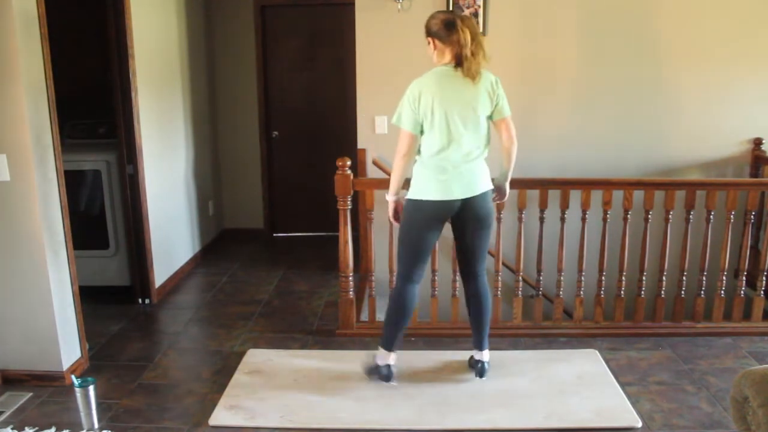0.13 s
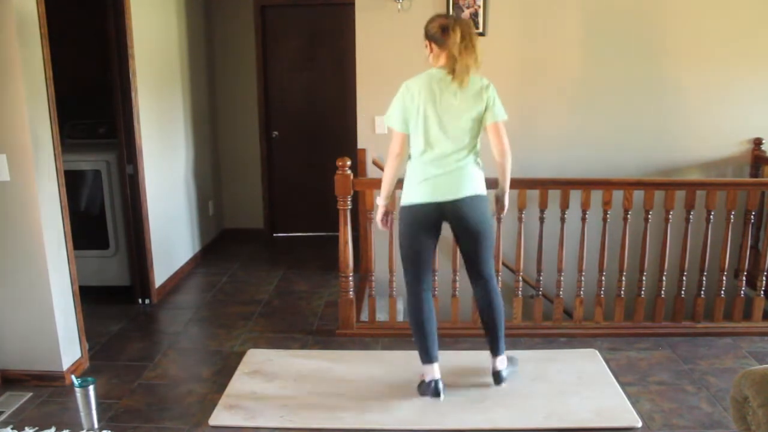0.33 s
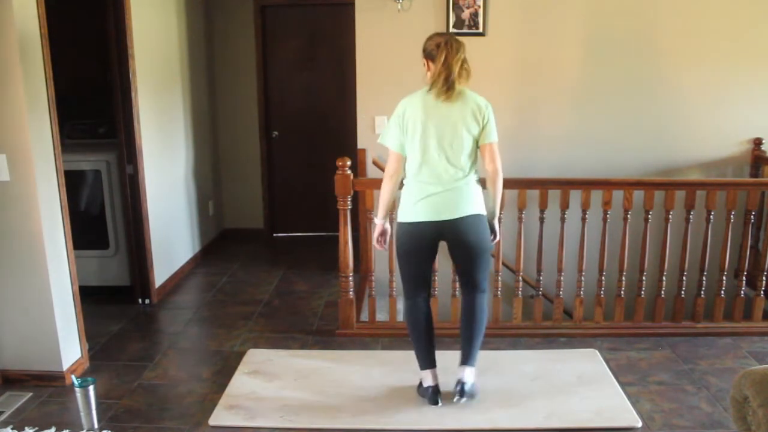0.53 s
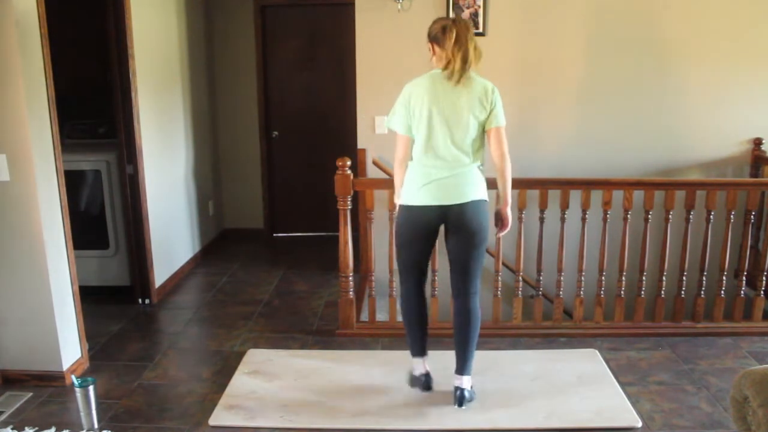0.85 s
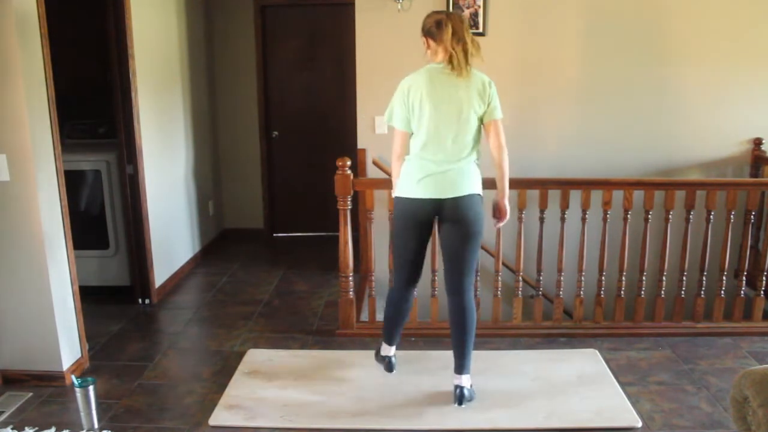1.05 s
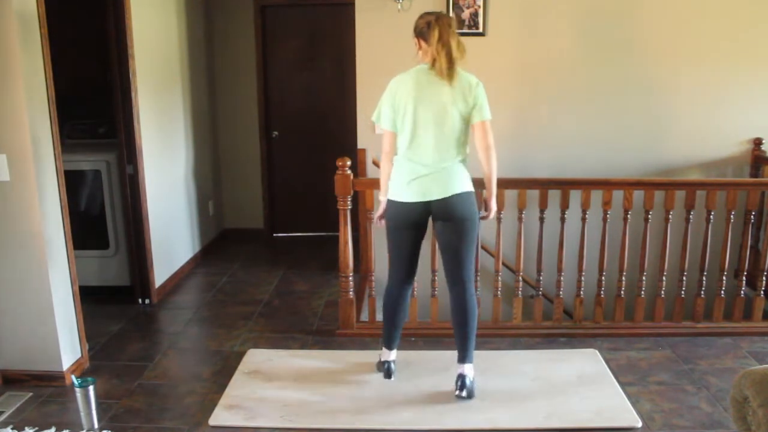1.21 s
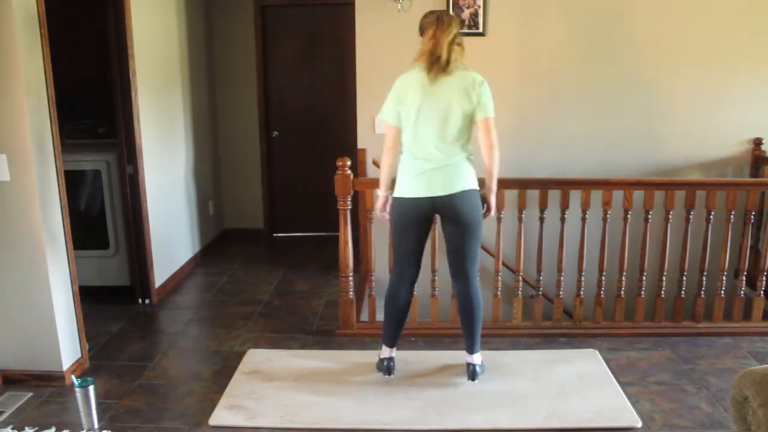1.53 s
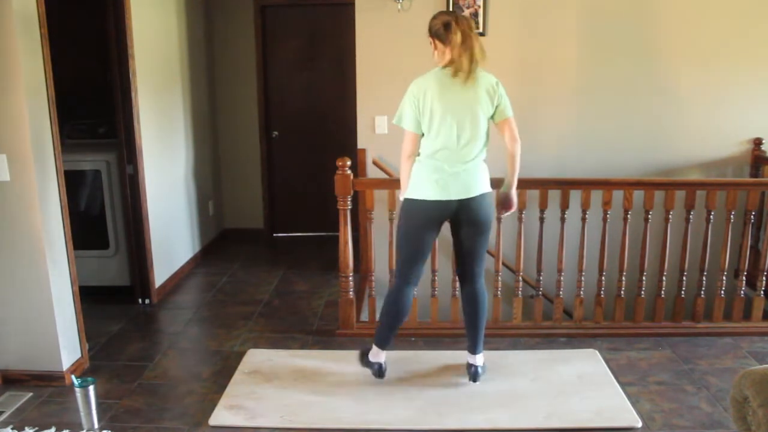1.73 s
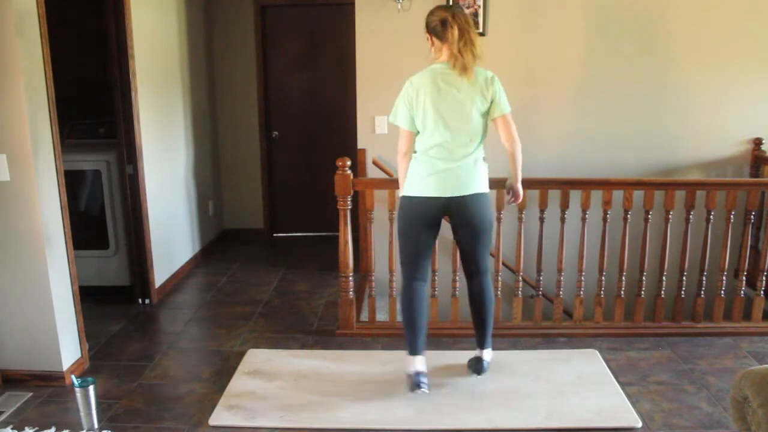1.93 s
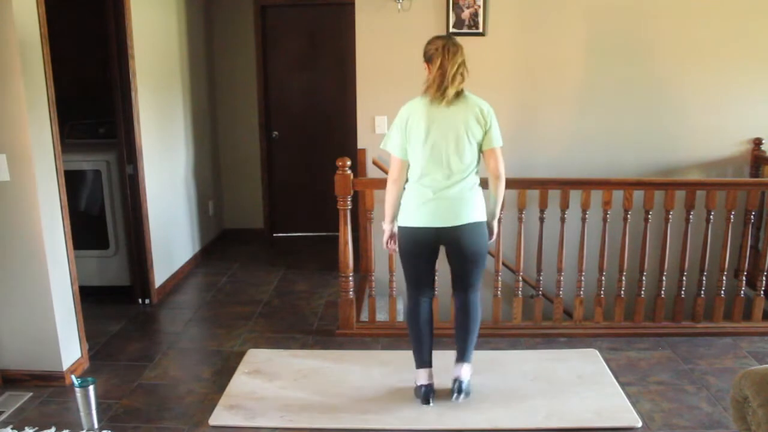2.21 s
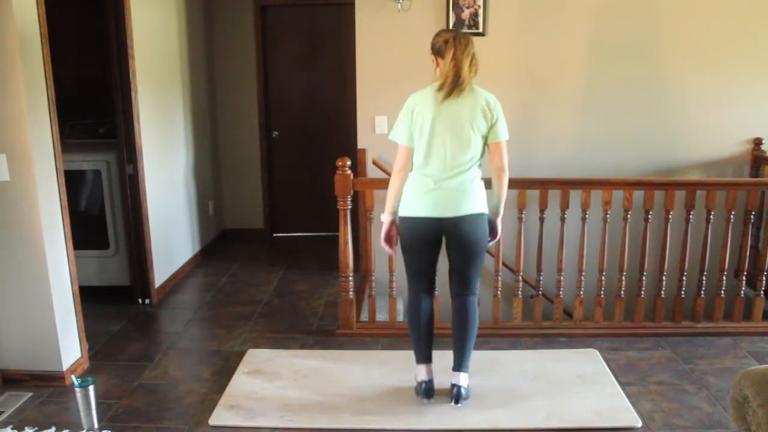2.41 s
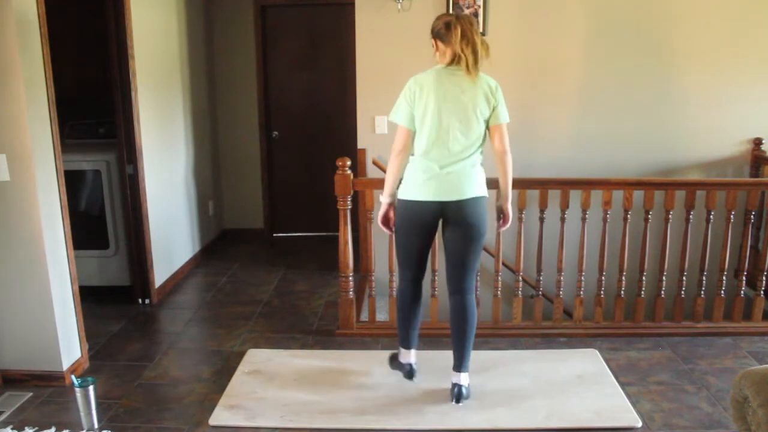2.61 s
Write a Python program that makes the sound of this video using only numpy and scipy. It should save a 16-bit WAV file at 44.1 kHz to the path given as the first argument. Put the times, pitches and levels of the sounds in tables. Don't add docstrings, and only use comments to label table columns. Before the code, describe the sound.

Metal-tipped tap shoes crack on a wooden board: a quick group of four, two separate taps, then a loud stamp and three quick taps, with bright room echo, faint hiss and a slightly overloaded camera microphone.

```python
import sys
import numpy as np
from scipy import signal
from scipy.io import wavfile
from scipy.ndimage import minimum_filter1d

SR = 44100
rng = np.random.default_rng(int(sys.argv[2]) if len(sys.argv) > 2 else 0)


def file_out(sig):
    cols = np.atleast_2d(sig).T
    lim = np.clip(cols, -1, 1)
    pcm = np.round(lim * 32767).astype(np.int16)
    wavfile.write(sys.argv[1], SR, pcm)


def gain_from_db(level_db):
    decades = np.asarray(level_db, float) / 20
    return 10 ** decades


N = 121275
LEAD = 22050

# start in seconds, level in dB, step kind (row of STEP_KINDS and SKIMMING).
TAPS = [(-.2, -8, 7), (.2155, -2, 0), (0.3442, -10, 1), (.448, -10.5, 2), (.6066, -7, 3), (1.1668, -3.5, 4),
        (1.52, -10, 5), (1.8743, 1.5, 6), (2.0217, -9, 1), (2.1260, -10.5, 2), (2.2779, -5.5, 3)]
# frequency in Hz, width in Hz.
RESONANCES = [(330, 300), (580, 560), (1000, 420), (1400, 390), (1800, 730), (2400, 1330), (2900, 1050),
              (3500, 930), (4300, 2700), (5500, 1500), (6800, 3700), (8300, 3200), (12000, 5900)]
# pitch factor, list of lifts in dB, one per resonance.
STEP_KINDS = [
    (1.0, [-1, 6.5, -0.5, 3.5, 7, -1, 9.5, 6.5, -1, 2.5, 6, 6, 4.5]),
    (1.0, [4.5, 6, -4.5, 0, 13.5, -9, -0.5, -1.5, 8.5, 4, -3.5, 17.5, 2]),
    (1.0, [1, -2.5, 5, 4.5, 15.5, -13.5, 5.5, 5.5, 4, -3, 1.5, 1.5, -4]),
    (1.0, [-1.5, -4.5, 3, 2, 11, -11, 10, 2, 5.5, -3.5, 2.5, -0.5, -0.5]),
    (1.0, [1, 9, -0.5, 0.5, 2, 6, 2, 7, -2.5, 6, 2, 8.5, 5]),
    (1.0, [2.5, 6, 1, 3.5, 9, -7.5, 3, 4.5, 9, -6, 7, 11, 7.5]),
    (1.0, [-6.5, 0, 0.5, 4, 9, -6, 10.5, 5.5, 1, 0.5, 1.5, 0.5, 0.5]),
    (1.0, [2.5, 5, 0, 1.5, 5, -2, 2.5, 3, 4.5, 3.5, 3, 9, 5]),
]
# ring in Hz, ring in dB, click in dB.
SKIMMING = [(2070, -16, 0), (2050, -19.5, -1.5), (1890, -29.5, -1.5), (4100, -16.5, -1), (2190, -16.5, 0.5),
            (3780, -20, 0.5), (2190, -21, -2), (2000, -13, 1)]
# start in seconds, level in dB, pitch in Hz.
THUDS = [(.362, -30.5, 175), (.44, -45, 75.5), (.69, -51, 78.5), (1.27, -50, 120), (1.58, -49, 173),
         (1.6, -60, 107), (2.05, -29.5, 179), (2.105, -37.5, 78), (2.32, -39.5, 74.5)]
# start in seconds, level in dB.
TICKS = [(.0419, -52), (.07, -63), (.859, -64), (.9109, -58), (1.722, -55), (2.478, -65), (2.53, -66),
         (2.7328, -70)]
# delay in seconds, level in dB, top frequency in Hz.
ECHOES = [(.0025, -13, 7000), (.0055, -3, 13000), (.0095, -8, 5000), (.012, -9, 9000), (.0225, -16, 5000),
          (.0327, -8, 12000)]
# frequency in Hz, 60 dB decay time in seconds, level in dB.
TAIL = [(59.7, 0.43, -7), (252, 0.57, -2.5), (580, 0.58, 1.5), (1570, 0.65, -2.5), (3740, 0.6, -4.5),
        (5920, 0.51, -6), (9500, .42, -8.5), (16000, 0.26, -1)]
# frequency in Hz, level in dB.
HOUSE_NOISE = [(30, -11), (120, -21), (190, -10), (500, -14.5), (800, -24), (2000, -29), (5000, -29.5),
               (16000, -49)]
BAND_EDGES = 25 * 2 ** np.arange(0, 9.6, .5)

CONTACT_HZ, BOARD_HZ, CRACK_DB = 4790, 486, 16
UNEVEN_DB = 0.7
EARLY_S, EARLY_DB, EARLY_HZ = 0.002, -17, 2100
THUD_T60_S, THUD_SOFT_S = 0.076, 0.0021
TICK_HZ, TICK_T60_S, TICK_ROOM_DB, TICK_FADE_S = 12300, 0.0013, 19, 0.012
TAIL_DB, TAIL_RISE_S = -23, 0.017
SCATTER_PER_S, SCATTER_DB = 190, 8
SMEAR_S = 0.0005
NEAR_LOW_HZ, NEAR_TOP_HZ, NEAR_T60_S = 545, 7000, 0.0032
HOUSE_DB, WHINE_HZ, WHINE_DB, WHINE_WIDTH_HZ = -63.5, 7800, -86, 120
LIMIT_DB, ATTACK_S, RELEASE_DB_PER_S, PEAK_HOLD_S = -18, 0.017, 155, 0.0069
CLIP_TOP, CLIP_HARDNESS = 0.18, 5
MIC_LOW_HZ, MIC_TOP_HZ = 65, 15800


def at_hz(points, hz, column=1):
    table = np.array(points)
    return np.interp(np.log(hz), np.log(table[:, 0]), table[:, column])


def ring(x, hz, t60):
    r, w = gain_from_db(-60 / (t60 * SR)), 2 * np.pi * hz / SR
    return signal.lfilter([0, np.sin(w)], [1, -2 * r * np.cos(w), r * r], x + 1e-18)


def lift(x, hz, width_hz, db):
    a, w = gain_from_db(db / 2), 2 * np.pi * hz / SR
    q = np.sin(w) * width_hz / hz / 2
    middle = -2 * np.cos(w)
    return signal.lfilter([1 + q * a, middle, 1 - q * a], [1 + q / a, middle, 1 - q / a], x + 1e-18)


def noise_bands(white):
    for k, (low, high) in enumerate(zip(BAND_EDGES, BAND_EDGES[1:])):
        band = signal.butter(2, [low, high], "band", fs=SR, output="sos")
        yield np.sqrt(low * high), signal.sosfilt(band, white[k % 2])


def add(track, x, s):
    i = int(round(s * SR)) + LEAD
    track[i:i + len(x)] += x[:len(track) - i]


def dancer():
    track, rooms = np.zeros(N + LEAD), hallway(count=len(TAPS))
    draws = rng.standard_normal((len(TAPS), len(RESONANCES)))
    for (s, db, kind), draw, room in zip(TAPS, draws, rooms):
        heard = signal.fftconvolve(tap(int(round(kind)), draw), room)
        add(track, gain_from_db(db) * heard, s - EARLY_S)
    for (s, db, hz), room in zip(THUDS, rooms):
        add(track, gain_from_db(db) * signal.fftconvolve(thud(hz), room), s)
    fade = np.exp(-np.arange(SR) / SR / TICK_FADE_S)
    for (s, db), room in zip(TICKS, rooms):
        heard = signal.fftconvolve(plate_tick(), room * fade)
        add(track, gain_from_db(db + TICK_ROOM_DB) * heard, s)
    return track[LEAD:]


def tap(kind, draw):
    factor, lifts = STEP_KINDS[kind]
    t = np.arange(4000) / SR - EARLY_S
    click = gain_from_db(CRACK_DB) * (np.arange(4000) == int(EARLY_S * SR))
    body = signal.lfilter(*signal.butter(1, BOARD_HZ, "high", fs=SR), click)
    body = signal.lfilter(*signal.butter(2, CONTACT_HZ, fs=SR), body)
    for (hz, width_hz), db, uneven in zip(RESONANCES, lifts, draw):
        body = lift(body, hz * factor, width_hz, db + UNEVEN_DB * uneven)
    swell = (t < 0) * np.exp(3 * np.minimum(t, 0) / EARLY_S)
    return body + gain_from_db(EARLY_DB) * swell * np.sin(2 * np.pi * EARLY_HZ * factor * t)


def thud(hz):
    t = np.arange(8000) / SR
    boom = ring(t * np.exp(-t / THUD_SOFT_S), hz, THUD_T60_S)
    return boom / np.abs(boom).max()


def plate_tick():
    click = np.zeros(8000)
    click[0] = 1
    return ring(click, TICK_HZ, TICK_T60_S)


def hallway(count):
    near = signal.lfilter(*signal.butter(1, [NEAR_LOW_HZ, NEAR_TOP_HZ], "band", fs=SR), wall_echoes(count))
    rooms = tail(count)
    for room, path, (_, _, kind) in zip(rooms, near, TAPS):
        hz, ring_db, click_db = SKIMMING[int(round(kind))]
        room += gain_from_db(click_db) * path + gain_from_db(ring_db) * ring(path, hz, NEAR_T60_S)
    return rooms


def wall_echoes(count):
    near = np.zeros((count, SR))
    near[:, 0] = 1
    for s, db, hz in ECHOES:
        burst = rng.standard_normal((count, 200)) * np.exp(-np.arange(200) / SR / SMEAR_S)
        burst = burst / np.sqrt(np.sum(burst ** 2, axis=1, keepdims=True))
        burst = signal.lfilter(*signal.butter(2, hz, fs=SR), burst)
        near[:, int(s * SR):int(s * SR) + 200] += gain_from_db(db) * burst
    return near


def tail(count):
    t = np.arange(SR) / SR
    scattered = rng.random((count, SR)) < SCATTER_PER_S / SR
    white = rng.standard_normal((2, count, SR)) * (1 + gain_from_db(SCATTER_DB) * scattered)
    rise = 1 - np.exp(-t / TAIL_RISE_S)
    out = np.zeros((count, SR))
    for hz, band in noise_bands(white):
        level_db = TAIL_DB + at_hz(TAIL, hz, column=2) - 60 * t / at_hz(TAIL, hz)
        out += band * gain_from_db(level_db) * rise
    return out


def background():
    white = rng.standard_normal((2, N + SR))
    house = sum(gain_from_db(at_hz(HOUSE_NOISE, hz)) * band for hz, band in noise_bands(white))
    house = house[SR:]
    whine = ring(rng.standard_normal(N), WHINE_HZ, 2.2 / WHINE_WIDTH_HZ)
    return gain_from_db(HOUSE_DB) * house / house.std() + gain_from_db(WHINE_DB) * whine / whine.std()


def scene():
    return (dancer() + background())[None]


def band_limit(x):
    return signal.sosfilt(signal.butter(12, 16680, fs=SR, output="sos"), x)


def record(dry):
    t = np.arange(N) / SR
    over_db = np.maximum(20 * np.log10(np.abs(dry[0]) + 1e-9) - LIMIT_DB, 0)
    hold = int(PEAK_HOLD_S * SR)
    held = -minimum_filter1d(-over_db, hold, origin=hold // 2 - 1)
    r = np.exp(-1 / (ATTACK_S * SR))
    smooth = signal.lfilter([1 - r], [1, -r], held)
    release = RELEASE_DB_PER_S * t
    cut_db = np.maximum.accumulate(smooth + release) - release
    x = signal.sosfilt(signal.butter(2, MIC_LOW_HZ, "high", fs=SR, output="sos"), dry)
    x = x * gain_from_db(-cut_db) / CLIP_TOP
    x = CLIP_TOP * x / (1 + np.abs(x) ** CLIP_HARDNESS) ** (1 / CLIP_HARDNESS)
    mix = signal.sosfilt(signal.butter(8, MIC_TOP_HZ, fs=SR, output="sos"), x)
    return band_limit(mix)


dry = scene()
out = record(dry)
file_out(out)
```